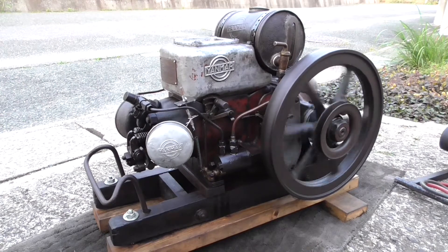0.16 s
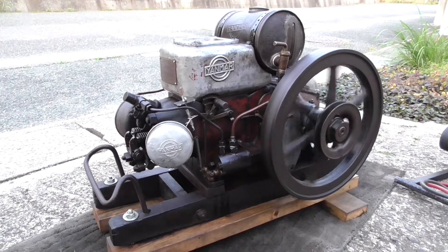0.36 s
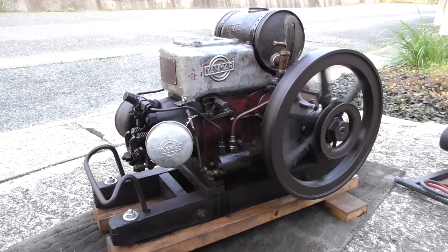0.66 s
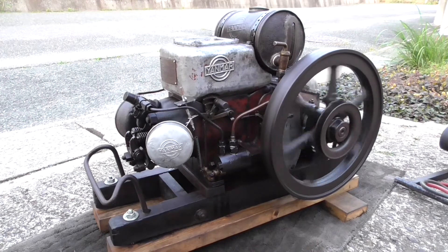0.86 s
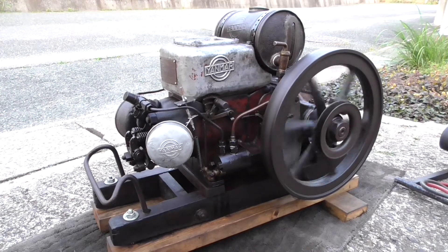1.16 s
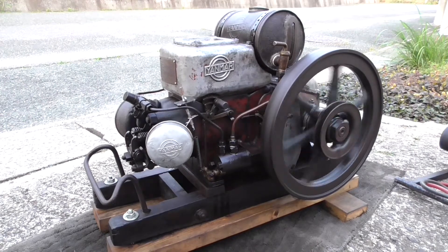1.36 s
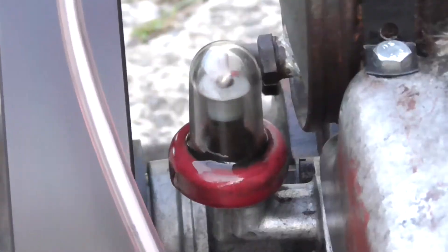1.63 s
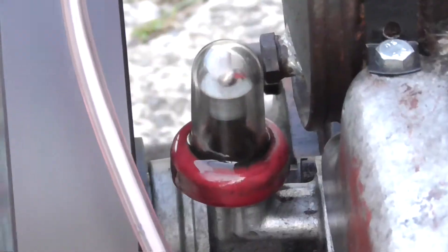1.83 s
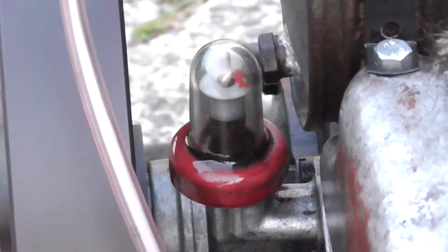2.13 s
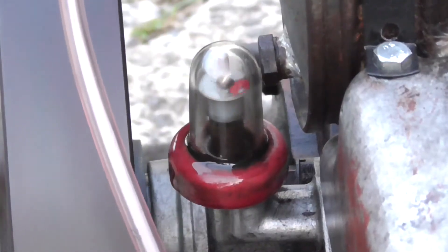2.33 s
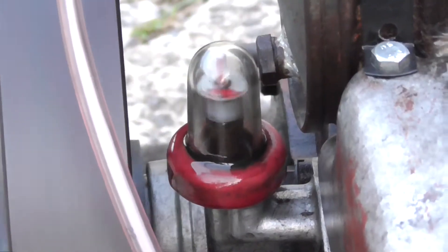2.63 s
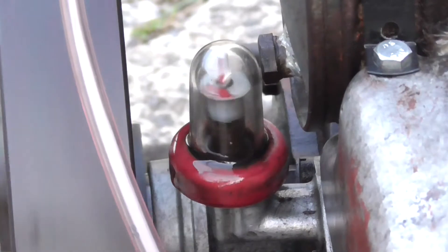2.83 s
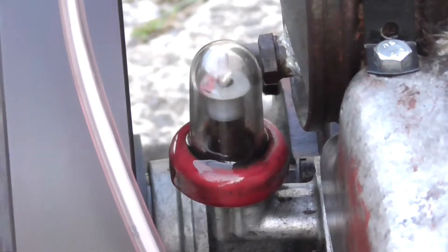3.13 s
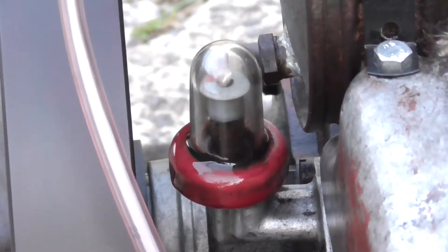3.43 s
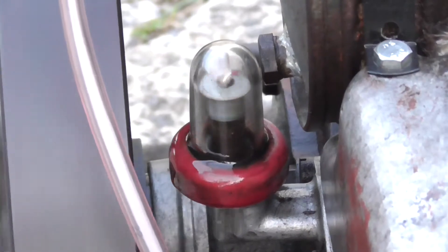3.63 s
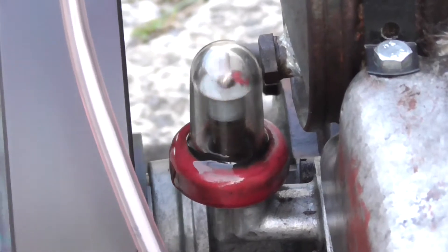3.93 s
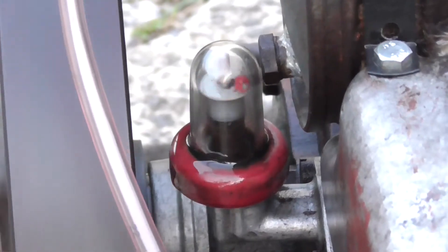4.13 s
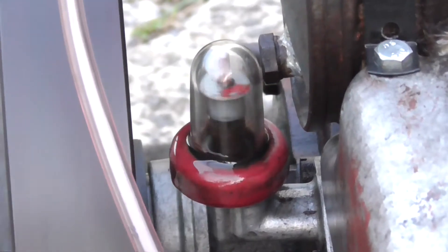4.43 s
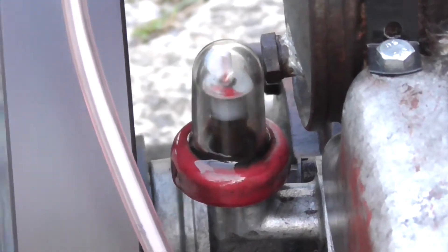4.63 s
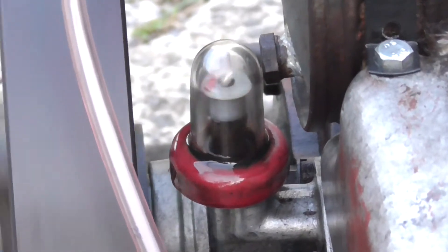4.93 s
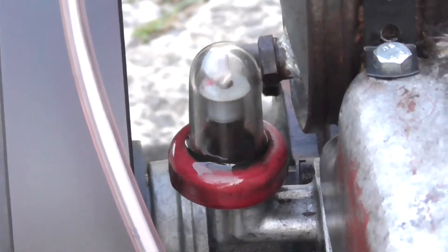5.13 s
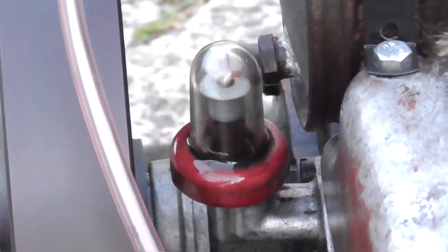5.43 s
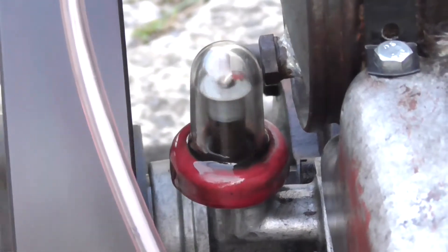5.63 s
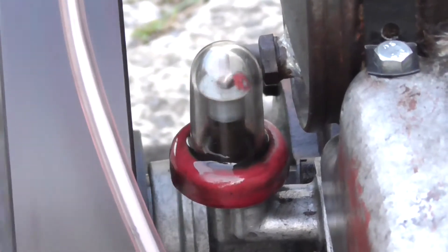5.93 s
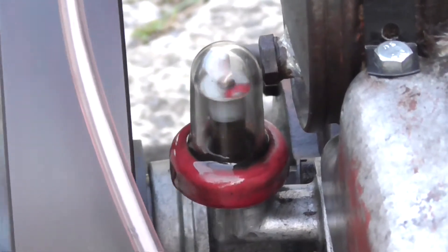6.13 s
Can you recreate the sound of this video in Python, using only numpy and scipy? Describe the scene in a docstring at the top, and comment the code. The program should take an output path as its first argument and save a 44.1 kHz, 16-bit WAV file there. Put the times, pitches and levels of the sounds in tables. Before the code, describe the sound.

A small old diesel engine chugs steadily in an open yard, its single cylinder knocking in a rapid, even rhythm with slightly varying force. Low puffs from the silencer alternate with valve ticks, hollow intake gulps and light iron ringing above a rattle of gears. The microphone starts a step away and switches abruptly to a close position early on, bringing out brighter mechanical detail as the idle continues.

```python
"""An old single-cylinder diesel chugs at idle outdoors, one firing about every 0.28 s, heard first
from a step away, then close by its head. Each four-stroke cycle: the fuel knocks, the piston slaps,
the exhaust valve lifts, the silencer puffs, gas whooshes out, the valve seats, the intake gulps and
the inlet valve clicks shut. The blows ring the iron block, gears and bearings churn underneath,
and the yard throws back a short, dull echo."""
import sys
import numpy as np
from scipy import signal
from scipy.fft import rfft, irfft, next_fast_len
from scipy.io import wavfile

SR = 44100
rng = np.random.default_rng(int(sys.argv[2]) if len(sys.argv) > 2 else 0)


def output_pcm(signal):
    """Save a mono or channel-first signal as 16-bit PCM at the path in sys.argv[1].

    Samples are clipped to [-1, 1] before scaling.
    """
    pcm = np.clip(np.atleast_2d(signal).T, -1, 1) * 32767
    wavfile.write(sys.argv[1], SR, np.round(pcm).astype(np.int16))


N = 276948

CLOSE_FROM_S = 1.46  # the listener cuts to the close position
LEAD = 2205  # samples of room for a blow to swell before its cue
AGE = np.arange(-LEAD, 4 * LEAD) / SR  # time axis of one blow, 0 on its cue [s]
# Valve timing, as shares of the cycle from one firing to the next
EXHAUST_OPENS, EXHAUST_SEATS, INLET_OPENS, INLET_SHUTS = 0.229, 0.504, 0.521, 0.771
# The firings, uneven as the governor meters the fuel
# (time [s], effort over a normal firing [dB], piston clank [dB], piston ping [dB])
FIRINGS = [(0.139, -1, -28, -25), (0.415, -6, -35, -38), (0.6954, -6, -34, -34), (0.9945, 0, -25, -23.5),
           (1.278, 2.5, -39, -33), (1.563, 1.5, -27, -37), (1.8394, -3.5, -28.5, -33.5),
           (2.1186, -4.5, -35, -33), (2.4044, 2.5, -21, -23.5), (2.6838, 1, -18.5, -38),
           (2.959, -2, -22, -40), (3.2346, -7, -26.5, -37), (3.519, 1.5, -18.5, -36), (3.799, 0, -21, -37),
           (4.0745, -2, -35, -41), (4.3514, -5, -30, -37), (4.6347, -0.5, -21, -43), (4.918, 0, -17.5, -28),
           (5.195, -1, -21, -37), (5.4707, -8, -28.5, -36.5), (5.757, -0.5, -22, -38), (6.044, 0, -22, -40)]


def undb(db):
    """Decibels to gain."""
    return 10 ** (np.asarray(db) / 20)


def level(x, db):
    """Set the rms level."""
    return x * undb(db) / np.sqrt(np.mean(x ** 2))


def on_log_axis(f, hz, values):
    """Join spectrum points on a log-frequency axis."""
    return np.interp(np.log(f + 1), np.log(hz), values)


def band(x, hz, width):
    """One resonant band, gain 1 at its centre."""
    return signal.lfilter(*signal.iirpeak(hz, hz / width, fs=SR), x)


def tint(x, hz, db, size=2048):
    """Minimum-phase EQ of unit power through the given points, rolling off below the lowest."""
    f = np.arange(size // 2 + 1) * SR / size
    roll_off = np.minimum((f + 5) / hz[0], 1) ** 2
    gain = undb(on_log_axis(f, hz, db)) * roll_off
    cepstrum = irfft(np.log(level(gain, 0)))
    cepstrum[1:size // 2] *= 2  # folding the cepstrum makes the filter causal
    cepstrum[size // 2 + 1:] = 0
    impulse = irfft(np.exp(rfft(cepstrum)))
    return signal.oaconvolve(x, impulse[None], axes=1)[:, :N]


def viewpoint(away, close):
    """Hard cut from a step away to close by."""
    return np.where(np.arange(N) < CLOSE_FROM_S * SR, away, close)


def coloured(x, table):
    """Give a sound its own EQ for each listening position."""
    hz, away_db, close_db = np.transpose(table)
    return viewpoint(tint(x, hz, away_db), tint(x, hz, close_db))


def swell(rise, fall, delay=0):
    """Envelope of one blow: exponential rise and fall about a crest at the delay, all in seconds."""
    t = AGE - delay
    return np.exp(-np.abs(t) / np.where(t < 0, rise, fall))


def ring(hz, rise, decay, delay=0, phase=0):
    """One damped resonance with its crest at the given delay."""
    return swell(rise, decay, delay) * np.cos(2 * np.pi * hz * (AGE - delay) + phase)


def bloom(t, crest_s, sharpness):
    """Rounded envelope: swells from rest to a crest of 1, then dies away."""
    u = np.maximum(t, 0) / crest_s
    return (u * np.exp(1 - u)) ** sharpness


def play(times, db, shape):
    """Trigger the same shape at each time, with its gain."""
    hits = np.zeros(N + LEAD)
    cues = np.clip(np.round(times * SR).astype(int), 0, N)
    np.add.at(hits, cues, undb(db))
    return signal.oaconvolve(hits, shape)[LEAD:LEAD + N]


def add(track, start, shape):
    """Mix one shape into a track at the given time."""
    out = np.zeros(N + 2 * len(AGE))
    out[int(start * SR):][:len(shape)] = shape
    return track + out[LEAD:LEAD + N]


def grit(grain_db, side_db=-19, treble_side_db=-11):
    """Stereo noise of tiny contacts of uneven size, wider in the treble."""
    mid, side, size = rng.standard_normal((3, N))
    grains = undb(grain_db * np.repeat(size, repeats=8)[:N])
    side = undb(side_db) * side + undb(treble_side_db) * band(side, 6100, 4400)
    return level(grains * (mid + side * np.array([[1], [-1]])), 0)


def cam(share):
    """Time [s] and effort [dB] as each cycle reaches this share; the engine is already running."""
    fired, effort, _, _ = np.transpose(FIRINGS)
    period = np.mean(np.diff(fired))
    edges = np.r_[fired[0] - period, fired, fired[-1] + period]
    times = edges[:-1] + share * np.diff(edges)
    heard = times > -LEAD / SR
    return np.maximum(times[heard], 0), np.r_[0, effort][heard]


def cam_blows(share, away_db, close_db, scatter_db=0.7):
    """Time [s] and gain [dB] of one blow a cycle; driven by the camshaft, they hardly vary."""
    times, _ = cam(share)
    db = np.where(times < CLOSE_FROM_S, away_db, close_db)
    return times, db + scatter_db * rng.standard_normal(len(times))


def breeze():
    """Faint moving air rumbles on each microphone port separately."""
    air = rng.standard_normal((2, N))
    return level(tint(air, [20, 60, 200, 1000], [-3, -2, -20, -60]), -65)


def yard(x, decay_s=0.019, wet_db=-19):
    """Ground and nearby walls scatter a short, dull echo, different at each ear."""
    t = AGE[LEAD:]
    echo = rng.standard_normal((2, len(t))) * np.exp(-t / decay_s) * (1 - np.exp(-t / 0.0022))
    echo /= np.sqrt(np.sum(echo ** 2) / 2)
    echo = signal.lfilter(*signal.butter(1, 3000, fs=SR), echo)
    return undb(wet_db) * signal.oaconvolve(x.mean(axis=0)[None], echo, axes=1)[:, :N]


def churn():
    """Gears and bearings lay a gritty bed under the blows."""
    # Tone of the running gear (frequency [Hz], relative level [dB])
    gear_eq = [(60, -18), (180, -3), (280, -6.5), (620, 1), (1000, 4), (1250, -4), (2900, -17.5),
               (4800, -21.5), (6400, -31), (8500, -22.5), (12000, -28), (15000, -38)]
    return level(tint(grit(4.1, side_db=-25.5), *np.transpose(gear_eq)), -37.5)


def block(force):
    """The blows all ring the same iron modes."""
    # Modes of the block and its covers (frequency [Hz], bandwidth [Hz], level [dB])
    iron_modes = [(858.4, 8.8, -44.5), (1018, 138, -42.5), (1459, 12, -52.5), (2181, 15, -49),
                  (2700, 30, -68), (3152, 27, -58), (4520, 26, -57), (4770, 74, -57.5), (8360, 77, -58.5)]
    return sum(level(band(force, hz, width), db) for hz, width, db in iron_modes)


def inlet_shut():
    """The cam follower scuffs off its ramp; the inlet valve clicks shut, its spring and port ring on."""
    # Tone of the valve click (frequency [Hz], level a step away [dB], level close by [dB])
    click_eq = [(208, 3.5, 4.5), (406, -20, -22.5), (670, 4, 0), (895, -24, -33), (1460, -10, -0.5),
                (2700, -27, -12.5), (3550, -19, -8.5), (5100, -18.5, -13), (6000, -24, -18),
                (7840, -15, -2.5), (10250, -7.5, -6.5), (12700, -10, 4.5), (15400, -33, -21.5)]
    times, db = cam_blows(INLET_SHUTS, away_db=-29.5, close_db=-27)
    click = play(times, db, undb(11.5) * swell(0.00023, 0.0012, 0.00036)) * grit(1.9)
    spring = play(times, db, undb(0.5) * swell(0.00064, 0.0052, 0.0026)) * grit(1.8)
    spring = tint(spring, [1400, 3500, 5200, 6500, 8400, 10000, 13000, 15000],
                  [6.5, -1.5, 4, -7.5, 7, -0.5, -6, -28])
    port = play(times, db, undb(-2.5) * ring(633, 0.0026, 0.0082, 0.00364))
    scuff = play(times, -36.5, swell(0.0041, 0.0085, -0.0078)) * grit(3.6)
    scuff = tint(scuff, [900, 2200, 4500, 7000, 15000], [-14, 10.5, -2, -21, -30])
    return coloured(click, click_eq) + spring + port + scuff, undb(-8.5) * click


def gulp(modes):
    """Suction comes first: the pressure dips, crests, and swings a few times more."""
    out = 0
    for hz, crest_s, db in modes:
        t = AGE + .75 / hz  # lines up each mode's first upward swing with the cue
        out -= undb(db) * bloom(t, crest_s, 1.57) * np.sin(2 * np.pi * hz * t)
    return out


def intake():
    """The opening inlet thumps the air in its pipe; gears rattle as the load reverses; air hisses in."""
    # Air modes of the pipe from each position (frequency [Hz], time to crest [s], level [dB])
    pipe_away = [(320, 0.0012, -1), (642, 0.0038, -7), (920, 0.00088, -3), (1500, 0.00038, -6)]
    pipe_close = [(278, 0.0012, -11), (550, 0.0026, -1), (1043, 0.0013, -4.5), (1450, 0.0014, -12.5)]
    # Tone of the gear rattle (frequency [Hz], level a step away [dB], level close by [dB])
    rattle_eq = [(97, -9, -3), (232, 3.5, -1.5), (392, -1.5, 0), (556, 2, 2.5), (910, -5.5, -0.5),
                 (1380, -2.5, -5), (2290, -9, -6.5), (3550, -17, -16.5), (4570, -7, -13.5),
                 (6200, -26.5, -26), (8400, -21, -21.5), (12100, -25, -29), (15000, -39, -37)]
    times, db = cam_blows(INLET_OPENS, away_db=-13, close_db=-14.5)
    thump = viewpoint(play(times, db + 3, gulp(pipe_away)), play(times, db + 5.5, gulp(pipe_close)))
    envelope = undb(-9.5) * swell(0.0047, 0.0059, 0.0065) + undb(-18.5) * swell(0.0057, 0.03, 0.0066)
    rattle = play(times, db, envelope) * grit(2.9)
    hiss = play(times, -42, swell(0.026, 0.024, 0.024)) * grit(1.5, side_db=-12)
    hiss = tint(hiss, [3000, 6450, 9200, 12100, 15500], [2, 0, 11.5, 1, -26])
    return thump + coloured(rattle, rattle_eq) + hiss, undb(-1.5) * rattle


def exhaust_lift(port_db_per_effort=0.77):
    """The rocker strikes the valve, released gas rings the port, and the tappet ticks at full lift."""
    # Tone of the rocker strike (frequency [Hz], level a step away [dB], level close by [dB])
    strike_eq = [(382, 6.5, 0), (980, -15, -11.5), (1510, -3, -10.5), (2500, -7, -18), (3560, -10.5, -16.5),
                 (5200, -7, -21.5), (6450, -16, -25), (8460, -7, -10.5), (10400, -10.5, -18.5),
                 (12800, -16, -21), (15000, -39, -40)]
    times, db = cam_blows(EXHAUST_OPENS, away_db=-27.5, close_db=-26.5)
    strike = play(times, db, undb(5) * swell(0.00089, 0.0053, 0.0005)) * grit(2.3)
    _, effort = cam(EXHAUST_OPENS)
    port_db = np.where(times < CLOSE_FROM_S, -32, -23) + port_db_per_effort * effort
    port = play(times, port_db, undb(9) * ring(606, 0.00086, 0.0045, 0.00183))
    tappet = play(times, db, undb(-16.5) * swell(0.0011, 0.0046, 0.023)) * grit(1.7)
    tappet = tint(tappet, [3000, 8040, 13000, 15500], [5, 8, -14, -26])
    return coloured(strike, strike_eq) + port + tappet, strike


def exhaust_whoosh(hz=720, climb=2.05, flutter_hz=110, db=-29.5):
    """The rising piston pushes gas past the valve; its hollow note climbs as the gap closes."""
    t = AGE + .02  # the note passes through hz 20 ms before the valve seats
    phase = 2 * np.pi * hz * t * (1 + climb * t)
    out = 0
    for seated in cam(EXHAUST_SEATS)[0]:
        flutter = signal.lfilter(*signal.butter(2, flutter_hz, fs=SR), rng.standard_normal((2, len(t))))
        note = level(flutter[0] * np.cos(phase) + flutter[1] * np.sin(phase), db)
        out = add(out, seated, note * swell(0.024, 0.0042, -0.0092))
    return out


def exhaust_seat():
    """Gas hisses out, then the valve snaps shut and rings the head."""
    # Tone of the valve snap (frequency [Hz], level a step away [dB], level close by [dB])
    snap_eq = [(151, -3, -4.5), (480, -3.5, 0), (990, 11.5, -3), (1790, -38, -28), (2570, -16, -15),
               (4020, -18, -24.5), (6700, -19.5, -21.5), (7800, -15, -10.5), (10100, -10, -11),
               (12060, -13, -4), (13700, -19, -13.5), (15300, -31, -19.5)]
    times, db = cam_blows(EXHAUST_SEATS, away_db=-18.5, close_db=-19.5)
    gas = play(times, -33.5, swell(0.016, 0.0095, -0.011)) * grit(3.7)
    gas = tint(gas, [150, 400, 750, 1050, 1600, 3000, 14000], [3, -9, -5, -0.5, -13, -15, -40.5])
    envelope = undb(5.5) * swell(0.00024, 0.00098, 0.00015) + undb(-3.5) * swell(0.0014, 0.0034, 0.00053)
    snap = play(times, db, envelope) * grit(0.91)
    low_ring = undb(-22) * ring(380, 0.0011, 0.0036, 0.0024)
    high_ring = undb(-1.5) * ring(1080, 0.001, 0.0028, 0.0013)
    head = play(times, db, low_ring + high_ring) * viewpoint(0.29, 0.52)
    return gas + coloured(snap, snap_eq) + head, undb(-4) * snap


def piston_slap(lag_s=0.0068):
    """Just after a firing the piston hits the cylinder wall: a clank, a crack and a bright ping."""
    # Modes of the cylinder wall (frequency [Hz], decay [s], level [dB])
    wall_modes = [(1009, 0.0089, -1.5), (1467, 0.0079, -2), (1596, 0.0018, 6), (2060, 0.0026, -2.5)]
    fired, _, clank_db, ping_db = np.transpose(FIRINGS)
    times = fired + lag_s
    clank = 0
    for hz, decay, db in wall_modes:
        phases = rng.uniform(0, 2 * np.pi, len(times))
        for start, hit_db, phase in zip(times, clank_db, phases):
            clank = add(clank, start, undb(hit_db + db) * ring(hz, 0.00063, decay, phase=phase))
    slap = play(times, ping_db, undb(2) * swell(0.0033, 0.0015, 0.00055)) * grit(2.1)
    crack = tint(slap, [1500, 4200, 6400, 8400, 11500, 15000], [-12, 2.5, 0, 3, -1.5, -27])
    ping = play(times, ping_db, undb(-0.5) * ring(5230, 0.00092, 0.0022, 0.000657))
    return clank + crack + ping, slap


def combustion(db_per_effort=0.3):
    """The fuel ignites with a knock that rumbles on in the casting; gas sizzles past the rings."""
    # Tone of the knock (frequency [Hz], level a step away [dB], level close by [dB])
    knock_eq = [(124, -7, -15.5), (427, -6.5, -3), (770, 2.5, -3), (930, 1.5, 6.5), (1620, -9.5, -6.5),
                (2350, -1.5, -8), (3200, -22, -18), (4660, -4, -18), (6170, -30, -26.5), (8400, -37, -31.5),
                (11200, -27, -28), (14700, -38, -43)]
    fired, effort, _, _ = np.transpose(FIRINGS)
    attack = undb(-1) * swell(0.0014, 0.0073, 0.0018)
    tail = undb(-16.5) * swell(0.0087, 0.026, 0.0086)
    knock = play(fired, -21.2 + db_per_effort * effort, attack + tail) * grit(1.9)
    sizzle = play(fired, -48, swell(0.011, 0.0074, 0.053)) * grit(1.5) * viewpoint(undb(8), 1)
    sizzle = tint(sizzle, [5000, 8500, 11500, 15000], [-9, -3, -0.5, -20])
    return coloured(knock, knock_eq) + sizzle, knock


def silencer(hz=148, hz_per_db=1.5, glide=6.6, puff_db=-15.5, lag_s=0.00784, lag_s_per_db=0.0004):
    """Each puff swings the air in the silencer; hotter gas pitches it up, more so as the pot fills."""
    t = np.maximum(AGE, 0)
    opens, effort = cam(EXHAUST_OPENS)
    times = opens + lag_s + lag_s_per_db * effort  # a stronger puff takes longer to fill the pot
    levels, pitches = puff_db + effort, hz + hz_per_db * effort
    out = play(times, levels, undb(-17.5) * ring(92, 0.01, 0.006, 0.0044))  # low thud under the puff
    for start, db, pitch in zip(times, levels, pitches):
        swing = -np.sin(2 * np.pi * pitch * t * (1 + glide * t))
        out = add(out, start, undb(db) * bloom(t, 0.0084, 2.62) * swing)
    return out


def scene():
    """The engine in its yard; each blow gives its own sound and a force that rings the block."""
    blows = combustion(), piston_slap(), exhaust_lift(), exhaust_seat(), intake(), inlet_shut()
    sounds, forces = zip(*blows)
    engine = sum(sounds) + block(sum(forces)) + silencer() + exhaust_whoosh() + churn()
    return engine + yard(engine) + breeze()


def record(dry, low_cut_hz=50, top_hz=15400):
    """Two close microphone ports differ in level and phase; the deep bass and the top are cut."""
    # Stereo balance of the ports (frequency [Hz], left minus right [dB])
    port_balance = [(100, -1), (200, -1.3), (380, -3), (750, -1), (2400, 0.5), (4400, -2.5), (8100, 2),
                    (14000, -5.5)]
    # Phase between the ports (frequency [Hz], lead of the left [rad])
    port_phase = [(100, 0.051), (900, 0.3), (2700, -0.13), (7000, 0.49), (9700, -1.92), (12000, -0.64),
                  (15000, -1.7)]
    size = next_fast_len(N + LEAD, True)
    f = np.arange(size // 2 + 1) * SR / size
    balance_db = on_log_axis(f, *np.transpose(port_balance))
    lead_rad = on_log_axis(f, *np.transpose(port_phase))
    left = undb(balance_db / 2) * np.exp(.5j * lead_rad)  # the right port gets the inverse
    low_cut = f ** 2 / (f ** 2 + low_cut_hz ** 2)
    ports = irfft(rfft(dry, size) * low_cut * np.array([left, 1 / left]), size)[:, :N]
    return signal.sosfilt(signal.ellip(8, .2, 80, top_hz, fs=SR, output="sos"), ports)


dry = scene()
out = record(dry)
output_pcm(out)
```